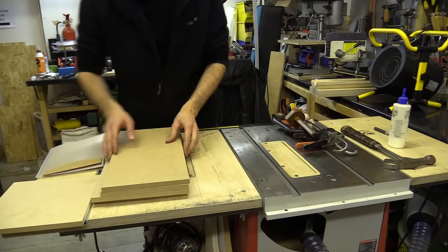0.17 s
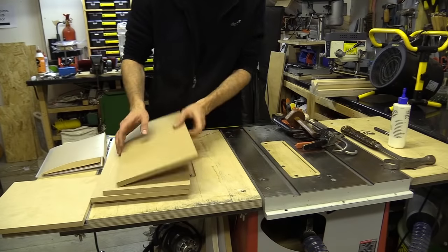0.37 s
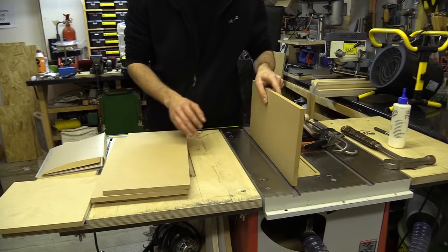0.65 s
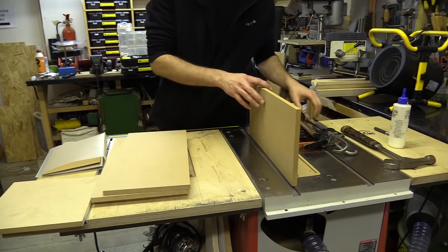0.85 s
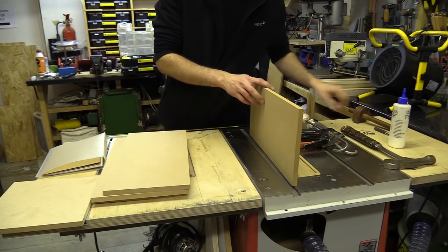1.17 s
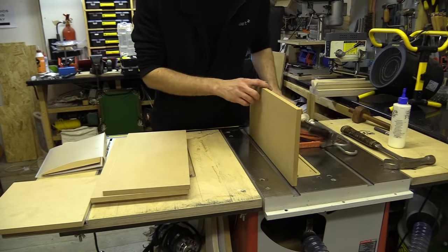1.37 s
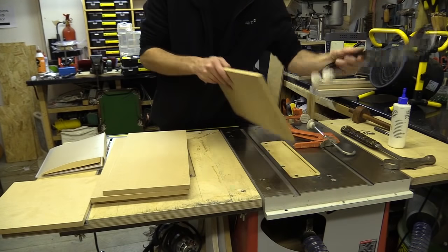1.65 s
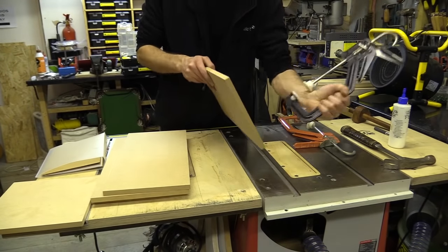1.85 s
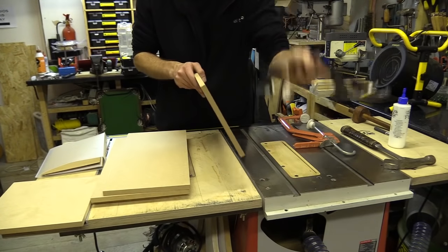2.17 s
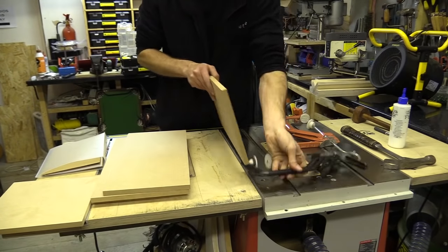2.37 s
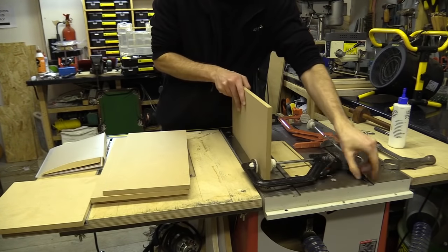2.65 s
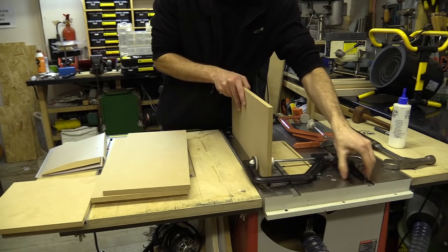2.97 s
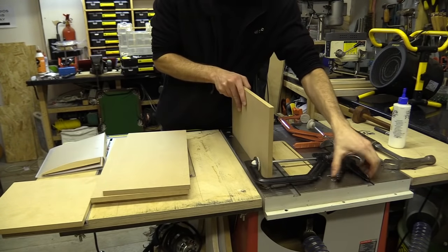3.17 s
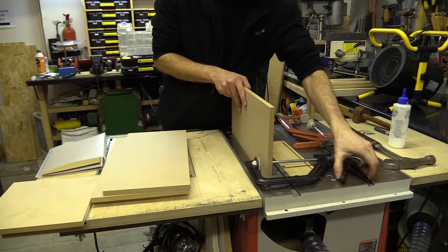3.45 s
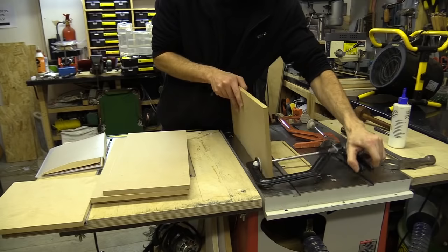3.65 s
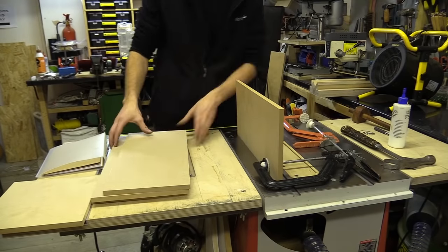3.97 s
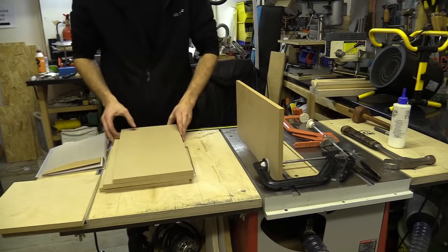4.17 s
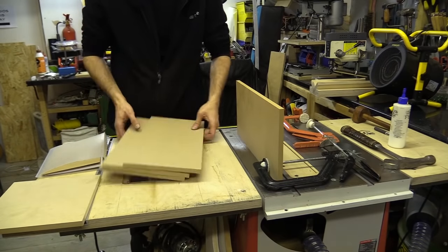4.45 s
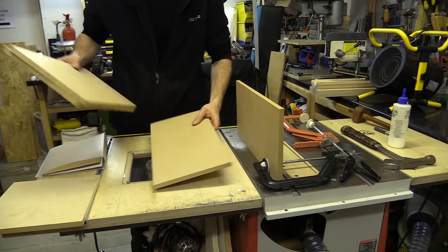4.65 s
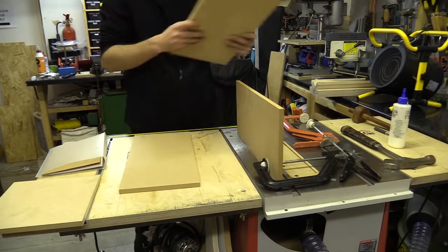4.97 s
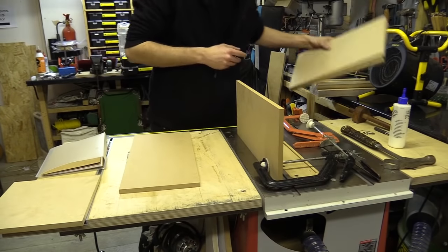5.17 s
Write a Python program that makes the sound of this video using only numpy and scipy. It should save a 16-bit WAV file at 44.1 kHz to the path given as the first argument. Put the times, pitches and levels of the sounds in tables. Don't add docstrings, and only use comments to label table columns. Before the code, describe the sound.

A small, cluttered workshop, dry and close, almost mono, with faint air noise and distant low motor hum. At 0.1-0.2 s panel edges clack, then a hand rubs across board at 0.3-0.5 s with sleeve rustle. Hard knocks at 0.7 s, and a cluster at 1.0-1.2 s with a very sharp crack at 1.12 s, set the iron bench top ringing briefly; another double knock falls at 1.43 s. From 1.5 to 2.4 s a loose steel clamp ticks and clinks lightly in the hand. It strikes the iron heavily at 2.45 and 2.59 s, is pushed home around 2.85 s, then tightened from 3.0 to 3.65 s in rapid rasping turns with clattering jolts and low thumps. After quiet scuffs, boards rub and shuffle at 4.1-4.5 s. A loud drag with a brief squeak at 4.6 s leads to a bouncing wooden clatter at 4.75-4.85 s, one last knock at 4.9 s, then soft rubbing and rustle.

```python
import sys
import numpy as np
from scipy import signal
from scipy.fft import rfft, irfft
from scipy.io import wavfile
from scipy.ndimage import uniform_filter1d

SR = 44100
rng = np.random.default_rng(int(sys.argv[2]) if len(sys.argv) > 2 else 0)


def voltage_ratio(level):
    return 10 ** (np.asarray(level, float) / 20)


def to_wav(sig):
    pcm = np.clip(np.atleast_2d(sig), -1, 1) * 32767
    pcm = np.round(pcm).astype(np.int16)
    wavfile.write(sys.argv[1], SR, pcm.T)


N = 234111

# f/Hz, level/dB
FLOOR_SPECTRUM = [(40, -28), (136, -13.5), (300, 1.5), (684, -1.5), (1710, -18.5), (6920, -15.5),
                  (9550, -28), (15500, -20)]
FLOOR_DB = -58
# f/Hz, width/Hz, level/dB
MACHINE_BANDS = [(75, 32, -67), (120, 20, -69), (250, 40, -75), (1260, 820, -65)]
# f/Hz, peak level/dB
MOTOR_TONES = [(139.8, -63), (299, -64)]
# t/s, effort/dB
ARM_EFFORT = [(0, -105), (.12, -53.5), (.36, -42.5), (.66, -55.5), (.8, -45.5), (1.36, -50), (1.75, -65),
              (2.0, -66.5), (2.42, -52), (2.57, -42), (2.7, -45), (2.95, -69), (3.4, -36.5), (3.799, -67),
              (4.1, -43), (4.62, -37.5), (4.73, -51.5), (5.31, -53)]
# f/Hz, density/dB
CLOTH_SPECTRUM = [(600, -15.5), (1500, -2), (3000, -5), (6000, 0), (10000, -6), (15500, -9.5)]

# start t/s, peak t/s, end t/s, friction/dB, brightness/dB
SLIDES = [(0, 0.006, 0.22, -67, -9), (0.281, 0.31, 0.36, -40.5, 0.5), (0.406, 0.412, 0.46, -48.5, 2),
          (0.435, 0.468, 0.515, -37, 6), (1.2, 1.31, 1.335, -50, -1), (1.619, 1.622, 1.84, -55, 7.5),
          (3.687, 3.723, 3.77, -39, -2.5), (3.933, 3.965, 3.99, -50.5, 3.5), (3.97, 4.006, 4.5, -57.5, 1),
          (4.075, 4.104, 4.14, -41, 13), (4.151, 4.207, 4.273, -32.5, 1), (4.318, 4.34, 4.365, -37, 6.5),
          (4.358, 4.384, 4.43, -43, 3), (4.446, 4.467, 4.5, -37.5, 4), (4.492, 4.53, 4.6, -39, 4),
          (4.959, 5.047, 5.16, -60.5, 7.5), (5.084, 5.104, 5.19, -62, 13), (5.128, 5.19, 5.28, -49.5, -6)]
# start t/s, peak t/s, end t/s, friction/dB, brightness/dB
SCREW_TURNS = [
    (2.843, 2.867, 2.89, -27.5, -6),
    (2.977, 3, 3.13, -36.5, -7),
    (3.113, 3.13, 3.185, -29.5, 1.5),
    (3.172, 3.186, 3.225, -31, 0),
    (3.229, 3.256, 3.33, -28.5, 0.5),
    (3.348, 3.343, 3.47, -28, 6.5),
    (3.497, 3.501, 3.56, -26.5, -1.5),
    (3.582, 3.57, 3.66, -33, 3),
]
# start below peak/dB, end below peak/dB, low part/dB, high part/dB
SLIDE_RULE, TURN_RULE = (14.5, 25.5, -8.5, -2.5), (6, 28.5, -13, -4.5)
SHOULDER = 1.44
SCREW_START_S, SCREW_END_S, THREAD_CLICKS_PER_S = 2.98, 3.68, 900
# f/Hz, width/Hz, level/dB
RUB_RESONANCES = [(1146, 28, -26), (2025, 84, 4.5), (4540, 640, -2), (5540, 200, 8), (6610, 390, -3.5),
                  (12350, 330, -29)]
LOW_EDGE_HZ, HIGH_EDGE_HZ = 1800, 7000

# t/s, peak level/dB, hardness/dB, t60/s
PANEL_KNOCKS = [(.1176, -13, -1, .1), (.2229, -9, 6, 0.09), (.2295, -10, 7.5, 0.11),
                (.5975, -36.5, -8, 0.04), (.6898, -6.5, -12, 0.075), (.7242, -2, -8, 0.075),
                (1.005, -12.5, -4, 0.12), (1.0118, -10, 17.5, 0.1), (1.1234, 3.5, -3.5, 0.023),
                (1.1404, -12.5, -5.5, 0.092), (1.1789, -7, 5, 0.079), (1.22, -36, 18, 0.02),
                (1.4267, -3, 6, 0.13), (1.4444, -9, 6, 0.1), (3.8641, -39, 3, .03),
                (3.9084, -40.5, 9, .038), (3.929, -29.5, 7.5, .047), (4.0037, -32, 20, 0.045),
                (4.0592, -19.5, 0.5, 0.025), (4.4797, -26, 5.5, 0.027), (.677, -40, 6, .06),
                (1.1, -42, 6, .08), (1.034, -17, 0, .07), (1.451, -4, 6, .06), (4.891, -1, 5.5, 0.073),
                (4.9854, -38.5, 18.5, 0.12)]
# t/s, peak level/dB, hardness/dB, t60/s
CLAMP_TICKS = [(1.5145, -1.5, -9.5, 0.082), (1.5388, -17.5, 6.5, 0.056), (1.7014, -32, -6, 0.049),
               (1.7827, -43.5, 27.5, 0.019), (1.8145, -29, -2, 0.081), (1.8334, -32, 4.5, 0.045),
               (1.8426, -11.5, -11, 0.012), (1.8513, -17, 5, 0.082), (1.8687, -25, 1.5, 0.086),
               (1.948, -35.5, -18, 0.055), (2.026, -31.5, -13, 0.047), (2.032, -43, 5, 0.096),
               (2.0514, -25.5, -7, 0.13), (2.064, -26, 0, 0.17), (2.0746, -16, 1, 0.07),
               (2.1316, -24.5, -5, 0.083), (2.1641, -20, -9, 0.048), (2.1997, -27.5, 0.5, 0.088),
               (2.2612, -32, -1, 0.1), (2.4134, -34, -6, 0.12), (1.747, -52, -14, .03),
               (1.7567, -42, -14, .03), (1.861, -31, 1, .03), (1.898, -36, -2, .02),
               (1.907, -38.5, 7, 0.0095), (1.913, -33.5, -6, .015), (1.918, -42, -4, .015),
               (1.922, -44, -2, 0.013), (1.984, -40, -20, .015), (2.12, -36, -2, .025),
               (2.1285, -32.5, -4, .02), (2.2515, -43.5, -3, .04)]
# t/s, peak level/dB, hardness/dB, t60/s
IRON_KNOCKS = [(2.4525, -8, 1.5, 0.11), (2.4576, 4, 1, 0.045), (2.5252, -32.5, -6, 0.24),
               (2.5755, -8, 5.5, 0.063), (2.589, 6, -7, 0.076), (2.6787, -16, 3.5, 0.11),
               (2.7332, -33, -11.5, 0.091), (2.7795, -22.5, 6, 0.058), (2.793, -8, 3.5, 0.095),
               (2.856, -15, -11, 0.097), (2.556, -30.5, 1, .04), (2.569, -26, -2, 0.043),
               (2.596, -4, -18, 0.031), (2.866, -12.5, -20, 0.071), (2.875, -17.5, -4, 0.089)]
# t/s, peak level/dB, hardness/dB, t60/s
SCREW_JOLTS = [(2.9815, -11.5, 0, 0.16), (2.9803, -6, 10, 0.008), (3.034, -14, 0, 0.14),
               (3.1238, -6.5, 4, 0.073), (3.142, -5.5, -3, 0.057), (3.1783, -16, 4, 0.06),
               (3.248, -10, 9.5, 0.097), (3.2982, -6, -7.5, 0.079), (3.3548, -10, -2, 0.076),
               (3.3654, -16, 10, 0.044), (3.3974, -3, 1, 0.088), (3.4246, -2, -6, 0.064),
               (3.49, -14.5, -6, 0.11), (3.5099, -9, 4.5, 0.096), (3.5919, -15.5, 5.5, 0.14),
               (3.6175, -7, -9.5, 0.068), (2.989, -11.5, 8, .02), (3.016, -17.5, 10, .04),
               (3.1175, -18.5, 4, .02), (3.1305, -7, 0, 0.018), (3.183, -24.5, 7, 0.028),
               (3.2407, -7.5, 1, .03), (3.2437, -12.5, 7.5, .02), (3.263, -7.5, -1, 0.052),
               (3.27, -16, -1.5, .03), (3.293, -22, 6.5, 0.023), (3.305, -11, -1, .04),
               (3.3619, -13, 5, .015), (3.393, -12, -2, 0.028), (3.4168, -3.5, -8, 0.046),
               (3.444, -19, 5, 0.037), (3.503, -13.5, 5, 0.043), (3.535, -15.5, -3, 0.1),
               (3.7017, -31, 9, .05)]
# t/s, peak level/dB, hardness/dB, t60/s
STACK_KNOCKS = [(4.7455, -2.5, -5, 0.023), (4.76, -11, -3, 0.016), (4.7655, -13, -5, 0.023),
                (4.771, -11, -8, .02), (4.8107, 6, 4.5, 0.025), (4.819, -19, 0, .02),
                (4.8296, -4.5, -1, .03), (4.84, -11, -6, 0.033), (4.8475, -18, -9, .02),
                (4.8525, -22, -5, .03), (4.874, -31, 10, 0.033)]
# low modes/dB, high modes/dB
PANEL_TONE, TICK_TONE, IRON_TONE = (-6, -9), (-26, 12.4), (-14.5, 0)
SCREW_TONE, STACK_TONE = (-8, 2.06), (-3.5, -1)
# f/Hz, width/Hz, level over broad part/dB
PANEL_BODY = [(1380, 94, 2), (1797, 94, 1.5), (1967, 79, 7.5), (2482, 70, 0.5), (3240, 170, 0.5),
              (4370, 52, -3.5), (4930, 130, 5.5), (5560, 150, 4.5), (6730, 250, 3.5)]
# f/Hz, width/Hz, level over broad part/dB
STACK_BODY = [(1086, 110, 5.5), (1880, 110, 6), (2500, 310, 10), (3340, 360, 10), (4610, 540, 12.5),
              (6000, 190, 17.5), (6764, 240, 9), (8050, 430, 10), (10500, 690, 3), (12400, 840, -12),
              (14700, 500, -8)]
# f/Hz, width/Hz, level over broad part/dB
STEEL_BODY = [(2453, 46, 2), (4700, 230, 4.9), (7380, 310, 6.9), (8110, 66, 3.3), (10720, 230, 4.3),
              (11570, 240, 5.6), (12260, 200, 7.2), (14180, 150, 5.4), (15200, 220, 4.3)]
# f/Hz, width/Hz, level over broad part/dB
IRON_BODY = [(1430, 140, 3.2), (1970, 160, 2.8), (2500, 65, 3.7), (3430, 170, 0.99), (4610, 320, 7),
             (5590, 320, 9.1), (6700, 250, 5), (7450, 210, 3), (9230, 45, 1.4), (11470, 300, 2.8),
             (13500, 480, 2.7)]
STACK_BROAD_DB = -8

# t/s, level/dB
BLOWS = [(.1176, -25.5), (.6898, -18), (.7246, -12.5), (1.0118, -20.5), (1.1234, -18), (1.1789, -30.5),
         (1.4267, -15.5), (1.4444, -9.5), (1.5145, -19), (2.4576, -18.5), (2.5252, -62), (2.574, -31),
         (2.589, -16), (2.6787, -42), (2.7332, -72), (3.142, -25), (3.3548, -28), (3.3974, -22.5),
         (3.4246, -44), (3.5099, -29), (3.6175, -29), (3.929, -40), (4.0592, -31.5), (4.4797, -37),
         (4.891, -22)]
# f/Hz, level/dB, t60/s
BENCH_MODES = [(692, -12.5, 0.13), (678.7, -3.5, 0.087), (613, -11.5, 0.031), (710, -9.5, 0.12),
               (705, -35.5, 0.22), (1401, -7, 0.041), (263.5, -28, 0.15)]
HUM_DB, HUM_FOLLOWS, HUM_T60_S, HUM_BY_HAND_DB = -44.5, 0.38, 0.61, -13

# t/s, level/dB, f/Hz, t60/s
PANEL_NOTES = [(0.122, -37.5, 108, 0.66), (.118, -26, 5800, .074), (.496, -37, 2540, .042),
               (0.7225, -15, 1490, .03), (.7262, -11.5, 2440, .02), (.7245, -14, 3330, 0.018),
               (.7262, -15.5, 1890, 0.038), (.7245, -22.5, 4930, .02), (1.1244, -1, 3066, .014),
               (1.124, -8, 2700, .014), (1.1238, -3.5, 3650, .016), (1.1238, -15, 2150, .014),
               (1.1238, -3.5, 4300, .014), (1.148, -31, 3100, .07), (1.181, -30.5, 4100, .1),
               (1.18, -18.5, 6080, .02), (1.427, -12.5, 6000, .025), (4.059, -29, 4440, .021),
               (4.747, -24, 1098, 0.1), (4.775, -23, 2500, 0.086), (4.891, -53, 340, .16),
               (4.892, -17.5, 1080, .025), (4.892, -28, 570, .05), (4.898, -42.5, 109, 0.79),
               (4.83, -14.5, 6040, .04)]
# t/s, level/dB,
# f/Hz, t60/s
HANDLING_NOTES = [(1.8156, -29, 8000, 0.027), (1.8515, -32, 13000, .07), (2.052, -40, 2480, .06),
                  (2.075, -22, 4690, 0.02), (2.026, -44, 2480, 0.035), (3.034, -19.5, 5590, .03),
                  (2.458, -6, 5560, 0.022), (2.459, -6, 4700, 0.022), (2.602, -33, 3120, 0.18),
                  (2.592, -17, 1900, .03), (2.678, -32, 5500, 0.021), (2.779, -33, 5100, 0.028),
                  (2.779, -38, 1400, 0.039), (3.299, -21, 1110, 0.076), (3.366, -19, 12800, .03),
                  (3.42, -10, 1404, 0.017), (3.619, -21, 1195, .072), (1.516, -36, 600, 0.056)]
# t/s, level/dB
THUMPS = [(0.122, -52), (0.7, -49), (1.03, -61), (1.139, -60), (1.443, -63.5), (2.467, -57), (2.598, -46.5),
          (2.697, -55.5), (2.861, -47), (3.029, -48), (3.131, -48), (3.261, -40), (3.36, -41.5),
          (3.431, -48), (3.511, -44), (3.624, -55), (3.942, -58), (4.101, -60), (4.328, -60), (4.45, -55),
          (4.549, -57.5), (4.798, -55.5)]
# f/Hz, level/dB, t60/s
LEG_MODES = [(73.5, 5, 0.47), (64, -13.5, 0.45)]
# start t/s, end t/s, level/dB, f/Hz
SINGING_MODES = [(1.235, 1.345, -52, 5350), (1.215, 1.3, -55, 6200), (3.178, 3.235, -37, 2094),
                 (3.59, 3.612, -36, 2100), (3.7, 3.758, -42, 1420), (3.717, 3.75, -43, 1950),
                 (3.715, 3.77, -52, 2700), (3.7, 3.735, -47, 8500), (3.84, 3.895, -59, 1410),
                 (3.96, 4.03, -59, 2060), (3.97, 4.03, -61, 3400), (3.975, 4.085, -59, 1420),
                 (4.57, 4.607, -28, 6000), (4.607, 4.64, -22, 6080), (4.642, 4.662, -25, 6150),
                 (4.605, 4.65, -36, 690), (4.605, 4.64, -38, 1150), (4.57, 4.685, -39, 1850)]
SING_WIDTH = 0.02

# t/s, level/dB, lean to high modes/(dB/octave), twin mode share, damped modes/dB
CLINKS = [
    (1.538, -26, -5, -0.099, 4),
    (1.7836, -38.5, 16.5, -0.2, 0),
    (2.076, -36, -6, 0.49, 0),
    (2.1675, -29, -13, -0.71, -12),
    (2.198, -28.5, -21, -.5, -8),
    (2.86, -58, 31, .3, 0),
]
# f/Hz, level/dB, t60/s
CLAMP_MODES = [(7260, -0.5, 0.086), (9500, -6, 0.03), (10400, 2.5, 0.065), (11600, 4.5, 0.03),
               (12520, 1, .07), (14220, -3.5, 0.05)]

# t/s, friction/dB, pitch factor
DRAGS = [
    [(4.56, -41, 1), (4.59, -20.5, 1.055), (4.63, -14, 1.015), (4.675, -20.5, 1.0), (4.69, -41, .98),
     (4.72, -63, .95)],
    [(4.768, -30, 1.01), (4.78, -24, 1.01), (4.81, -27.5, 0.97), (4.85, -40, 0.74), (4.885, -45, 1.1)],
    [(4.6, -45, 1.13), (4.62, -21, 1.07), (4.65, -24, 1.0), (4.678, -24, .93), (4.69, -50, .92)],
]
# f/Hz, width/Hz, level/dB
STACK_RESONANCES = [(1290, 1100, -7), (1710, 200, -6), (2450, 1100, -3.5), (3650, 58, 1.5), (4400, 330, -2),
                    (5860, 300, 11), (6900, 120, 7.5), (7760, 360, 10.5), (10100, 450, 6.5),
                    (13000, 510, 0), (14250, 500, -0.5)]

ROOM_T60_S, ROOM_DB, WALL_CUT_HZ = 0.11, -15, 1700
CUTOFF_HZ = 15800


def rms_one(x):
    return x / np.sqrt(np.mean(x ** 2) + 1e-20)


def band(x, low_hz, high_hz, order=2):
    return signal.sosfilt(signal.butter(order, [low_hz, high_hz], "band", fs=SR, output="sos"), x)


def coloured(points):
    hz, level_db = np.transpose(points)
    bins_hz = np.linspace(1, SR / 2, N // 2 + 1)
    gain = voltage_ratio(np.interp(np.log(bins_hz), np.log(hz), level_db))
    return rms_one(irfft(rfft(rng.standard_normal(N)) * gain, N))


def resonate(x, hz, width_hz):
    r = np.exp(-np.pi * width_hz / SR)
    zeros = np.array([1, 0, -1]) * (1 - r * r) / 2
    return signal.lfilter(zeros, [1, -2 * r * np.cos(2 * np.pi * hz / SR), r * r], x)


def ring(clicks, hz, t60_s):
    r = voltage_ratio(-60 / (t60_s * SR))
    w = 2 * np.pi * hz / SR
    return signal.lfilter([0, np.sin(w)], [1, -2 * r * np.cos(w), r * r], clicks + 1e-18)


def drift(rate_hz):
    knots = rng.standard_normal(2000)
    return np.interp(np.arange(N) * rate_hz / SR, np.arange(len(knots)), knots)


def clicks_at(t_s, level_db):
    clicks = np.zeros(N)
    clicks[(np.asarray(t_s) * SR).astype(int)] = voltage_ratio(level_db)
    return clicks


def struck(level_db, t_s, hz, t60_s):
    return ring(clicks_at(t_s, level_db), hz, t60_s)


def body(x, peaks, broad_db):
    y = voltage_ratio(broad_db) * x + sum(voltage_ratio(db) * resonate(x, hz, width) for hz, width, db in peaks)
    return rms_one(y) * np.sqrt(np.mean(x ** 2))


def room_tone():
    return voltage_ratio(FLOOR_DB + 1.8 * drift(9)) * band(coloured(FLOOR_SPECTRUM), 60, 15000)


def machinery():
    hum = np.zeros(N)
    for hz, width_hz, db in MACHINE_BANDS:
        hum += voltage_ratio(db) * rms_one(resonate(rng.standard_normal(N), hz, width_hz))
    for hz, db in MOTOR_TONES:
        hum += voltage_ratio(db) * np.sin(2 * np.pi * hz * np.arange(N) / SR)
    return hum


def cloth(effort):
    return effort * coloured(CLOTH_SPECTRUM) * voltage_ratio(2.4 * drift(45) - 10)


def friction_grit():
    grit = rng.standard_normal(N) * voltage_ratio(2.2 * drift(300) + 1.2 * drift(70))
    i = np.arange(N)
    turning = (i > SCREW_START_S * SR) & (i < SCREW_END_S * SR)
    catches = turning * (rng.random(N) < THREAD_CLICKS_PER_S / SR)
    catch_gain = voltage_ratio(4 * np.minimum(rng.exponential(1, N), 3))
    slips = catches * catch_gain * rng.choice([-1, 1], N)
    out = voltage_ratio(-1.5) * (grit + slips)
    for k, (hz, width_hz, db) in enumerate(RUB_RESONANCES):
        swell = voltage_ratio(db + 3.2 * drift(24))
        out += swell * resonate(grit + 9 * slips, hz, width_hz) * (-1) ** k
    return out


def strokes():
    grit = friction_grit()
    low = rms_one(band(grit, 220, LOW_EDGE_HZ))
    middle = -rms_one(band(grit, LOW_EDGE_HZ, HIGH_EDGE_HZ))
    high = rms_one(band(grit, HIGH_EDGE_HZ, 17000))
    t, gains = np.arange(N) / SR, np.zeros((3, N))
    rows = [row + SLIDE_RULE for row in SLIDES] + [row + TURN_RULE for row in SCREW_TURNS]
    for *s, peak_db, bright_db, rise_db, fall_db, low_db, high_db in rows:
        on = slice(int(s[0] * SR), int(s[-1] * SR))
        fade = np.clip(np.minimum(t[on] - s[0], s[-1] - t[on]) / 0.009, 0, 1)
        place = np.interp(t[on], s, [-1, 0, 1])
        sag_db = np.where(place < 0, rise_db, fall_db) * np.abs(place) ** SHOULDER
        for k, part_db in enumerate([low_db - bright_db, 0, high_db + bright_db]):
            gains[k, on] += fade * voltage_ratio(peak_db + part_db - sag_db)
    return gains[0] * low, gains[1] * middle + gains[2] * high


def knocks(rows, tone):
    size, lump_db = 4096, 1.8
    out, t = np.zeros(N + size), np.arange(size) / SR
    centres = np.geomspace(380, 19000, num=26)
    bins_hz = np.linspace(1, SR / 2, size // 2 + 1)
    place = np.interp(np.log(bins_hz), np.log(centres), np.arange(26))
    shares = np.clip(1 - np.abs(place - np.arange(26)[:, None]), 0, 1)
    shares[[0, -1]] = 0
    shares /= np.sqrt(np.mean(shares ** 2, axis=1, keepdims=True) + 1e-12)
    onset = 1 - np.exp(-t[None] * centres[:, None] * 0.5)
    crack = 1.22 * voltage_ratio(-60 * t / 0.0042)
    for s, peak_db, hard_db, t60_s in rows:
        contact = rng.standard_normal(size)
        contact[12] += 5.5
        bands = irfft(rfft(contact) * shares, size)
        lump, life = rng.standard_normal((2, len(centres)))
        low_db, high_db = tone[0] - hard_db, tone[1] + hard_db
        level_db = np.interp(np.log(centres), np.log([450, 1200, 2500, 5500, 10000]),
                             [low_db - 12.5, low_db, 0, 0, high_db])
        t60s = np.clip(t60_s, 0.005, 0.2) * (centres / 3000) ** -0.2 * voltage_ratio(life)
        dying = voltage_ratio(-60 * t / t60s[:, None]) + crack
        i = int(s * SR)
        out[i:i + size] += voltage_ratio(peak_db - 26.5 + level_db + lump_db * lump) @ (bands * dying * onset)
    return out[:N]


def panel_knocks():
    return body(knocks(PANEL_KNOCKS, PANEL_TONE), PANEL_BODY, broad_db=5.5)


def bench_ring(rubbing):
    s, blow_db = np.transpose(BLOWS)
    out = voltage_ratio(2.5) * resonate(rubbing, 637, 78) + resonate(rubbing, 1397, 60)
    for hz, db, t60_s in BENCH_MODES:
        uneven_db = rng.normal(0, 2.2, len(s))
        out += struck(blow_db + db - 6.5 + uneven_db, s + 0.00199, hz, t60_s)
    return out * voltage_ratio(3 * drift(70))


def bench_hum(effort):
    s, blow_db = np.transpose(BLOWS)
    kicks = clicks_at(s, HUM_DB + HUM_FOLLOWS * blow_db)
    after_blows = signal.lfilter([1], [1, -voltage_ratio(-60 / (HUM_T60_S * SR))], kicks + 1e-18)
    top = rms_one(resonate(resonate(rng.standard_normal(N), 684, 52), 686, 120))
    return (after_blows + voltage_ratio(HUM_BY_HAND_DB) * effort) * top * voltage_ratio(4 * drift(35))


def lone_modes():
    wobble = voltage_ratio(3 * drift(150))
    low, high = np.zeros(N), np.zeros(N)
    for s, db, hz, t60_s in PANEL_NOTES + HANDLING_NOTES:
        part = high if hz > 1000 else low
        part += struck(db, [s], hz, t60_s)
    return wobble * low + band(wobble * high, 500, 19000)


def thumps():
    s, push_db = np.transpose(THUMPS)
    sway = sum(struck(push_db + db + 3, s, hz, t60_s) for hz, db, t60_s in LEG_MODES)
    legs = band(sway * voltage_ratio(5 * drift(25) - 3), 58, 100)
    thud = struck(push_db + 5 + 4 * rng.standard_normal(len(s)), s, 233, 0.12)
    return legs + band(thud, 150, 300)


def singing():
    out = np.zeros(N)
    grit = rng.standard_normal(N)
    for start, end, level_db, hz in SINGING_MODES:
        on = slice(int(start * SR), int(end * SR))
        tone = resonate(resonate(grit[on], hz, SING_WIDTH * hz), hz, 4 * SING_WIDTH * hz)
        out[on] += voltage_ratio(level_db) * rms_one(tone) * np.sqrt(np.hanning(len(tone)))
    return out


def clamp_ticks():
    return body(knocks(CLAMP_TICKS, TICK_TONE), STEEL_BODY, broad_db=-3)


def clamp_bar():
    s, level_db, lean_db, twin, damped_db = np.transpose(CLINKS)
    out = np.zeros(N)
    for hz, db, t60_s in CLAMP_MODES:
        damped = 9000 < hz < 10000 or 11000 < hz < 13000
        octaves = np.log2(hz / CLAMP_MODES[0][0])
        clicks = clicks_at(s, level_db + db + lean_db * octaves + damped_db * damped)
        twins = clicks * np.interp(np.arange(N), (s * SR).astype(int), twin)
        out += ring(clicks, hz, t60_s) + ring(twins, hz + 29, t60_s)
    return band(out * voltage_ratio(1.5 * drift(90)), 5500, 19000, order=3)


def clamp_on_iron():
    hits = knocks(IRON_KNOCKS, IRON_TONE) + knocks(SCREW_JOLTS, SCREW_TONE)
    return body(hits, IRON_BODY, broad_db=2.5)


def drags():
    grit = rng.standard_normal(N) * voltage_ratio(2.1 * drift(350))
    bands = np.zeros(N)
    for k, (hz, width_hz, db) in enumerate(STACK_RESONANCES):
        bands += voltage_ratio(db) * rms_one(resonate(grit, hz, width_hz)) * (-1) ** k
    sliding = rms_one(bands) + voltage_ratio(-5.5) * rms_one(band(grit, 1760, 18000))
    settling = band(body(grit, STACK_BODY, broad_db=STACK_BROAD_DB), 820, 8100, order=1)
    edge = resonate(grit, 4500, 120)
    edge += voltage_ratio(-9) * resonate(grit, 3460, 110) + voltage_ratio(-14) * resonate(grit, 2540, 150)
    out = np.zeros(N)
    for rows, sound in zip(DRAGS, [sliding, settling, edge]):
        s, level_db, pitch = np.transpose(rows)
        at = np.arange(int(s[0] * SR), int(s[-1] * SR))
        read = at[0] + np.cumsum(np.interp(at / SR, s, pitch))
        moved = np.interp(read, np.arange(N), rms_one(sound))
        out[at] += voltage_ratio(np.interp(at / SR, s, level_db)) * moved
    return out


def stack_knocks():
    return body(knocks(STACK_KNOCKS, STACK_TONE), STACK_BODY, broad_db=STACK_BROAD_DB)


def room(x):
    t = np.arange(8192) / SR
    tail = rng.standard_normal(len(t)) * voltage_ratio(-60 * t / ROOM_T60_S) * (t > 0.003)
    dull = np.exp(-2 * np.pi * WALL_CUT_HZ / SR)
    tail = signal.lfilter([1], [1, -dull], tail)
    return voltage_ratio(ROOM_DB) * signal.fftconvolve(x, tail / np.sqrt(np.sum(tail ** 2)))[:N]


def scene():
    effort = voltage_ratio(np.interp(np.arange(N) / SR, *np.transpose(ARM_EFFORT)))
    background = band(room_tone() + machinery(), 52, 19000, order=3) + cloth(effort) + bench_hum(effort)
    rub_low, rub_rest = strokes()
    contacts = rub_low + rub_rest + panel_knocks() + bench_ring(rub_low)
    contacts += clamp_ticks() + clamp_bar() + clamp_on_iron() + drags() + stack_knocks()
    near = band(contacts, 190, 19000, order=3) + band(lone_modes(), 70, 19000)
    mono = near + room(near) + thumps() + background + singing()
    loudness = uniform_filter1d(np.abs(mono), size=512)
    side = voltage_ratio(-15) * band(mono * drift(60) * loudness, 200, 6000)
    side += voltage_ratio(-77) * rms_one(band(rng.standard_normal(N), 25, 110))
    return np.array([mono + side, mono - side])


def band_limit(x):
    return signal.sosfilt(signal.butter(12, 16530, fs=SR, output="sos"), x)


def record(dry):
    low_pass = signal.cheby2(12, 24, CUTOFF_HZ + 150, fs=SR, output="sos")
    mix = np.clip(signal.sosfilt(low_pass, dry), -1, 1)
    return band_limit(mix)


dry = scene()
out = record(dry)
to_wav(out)
```